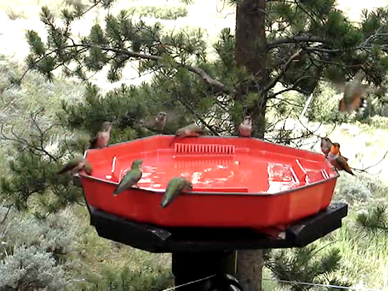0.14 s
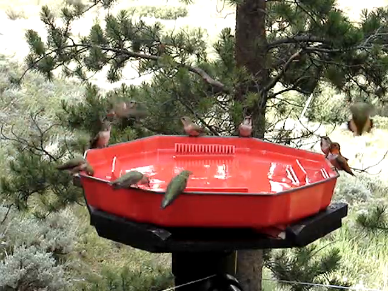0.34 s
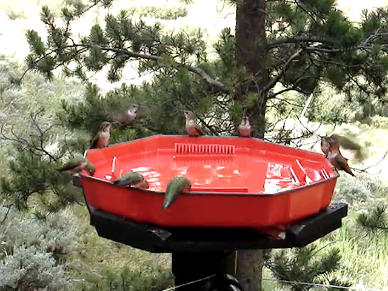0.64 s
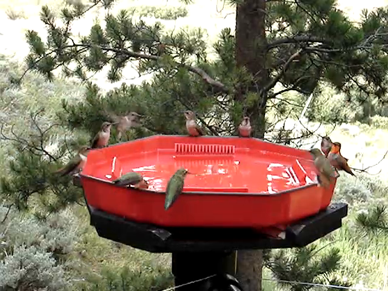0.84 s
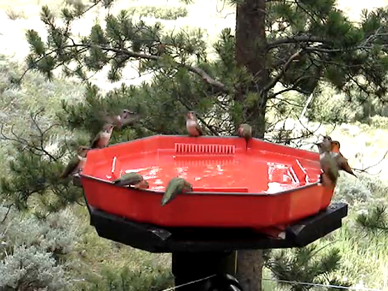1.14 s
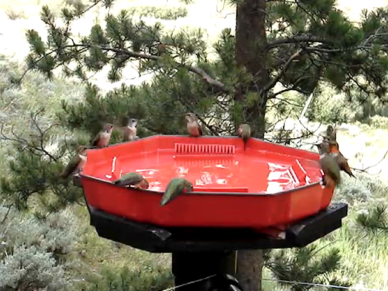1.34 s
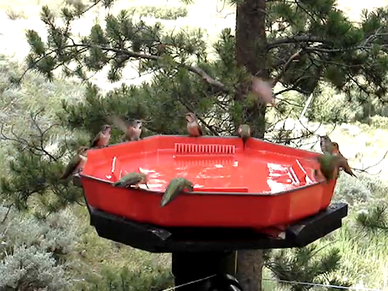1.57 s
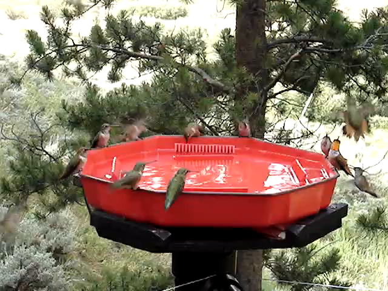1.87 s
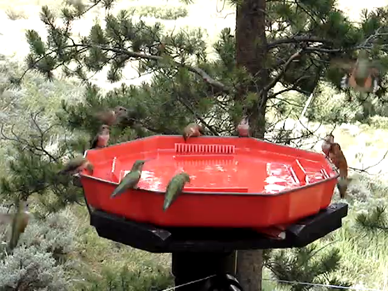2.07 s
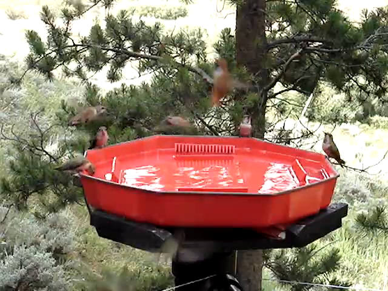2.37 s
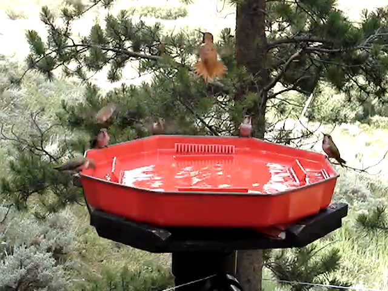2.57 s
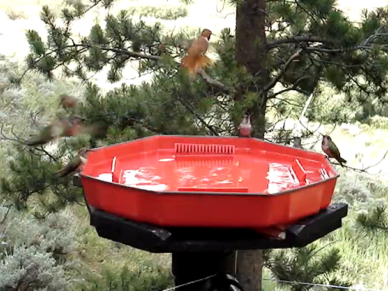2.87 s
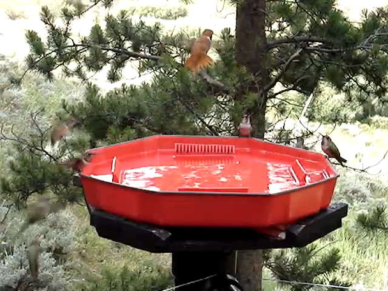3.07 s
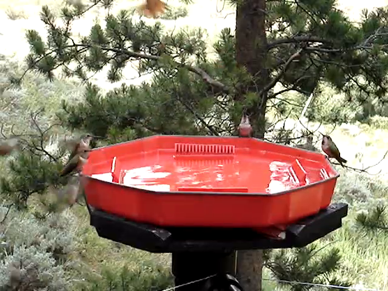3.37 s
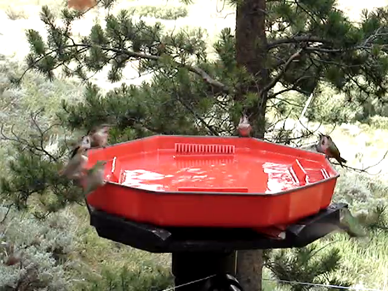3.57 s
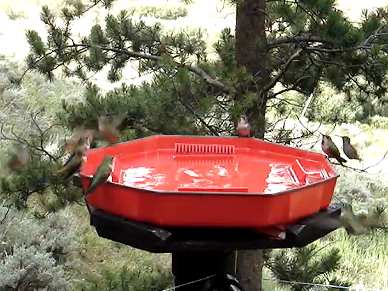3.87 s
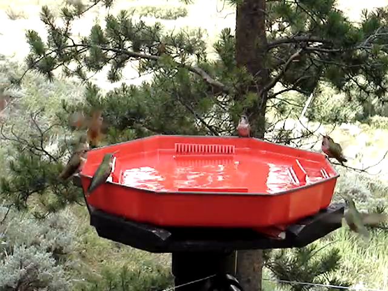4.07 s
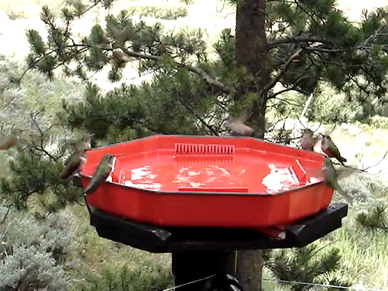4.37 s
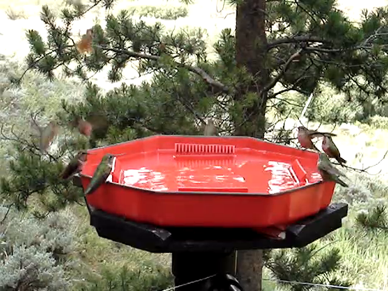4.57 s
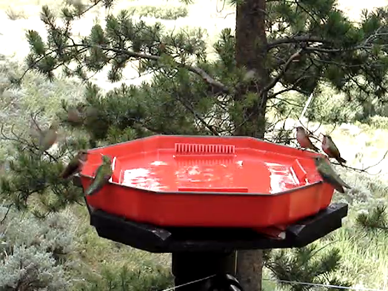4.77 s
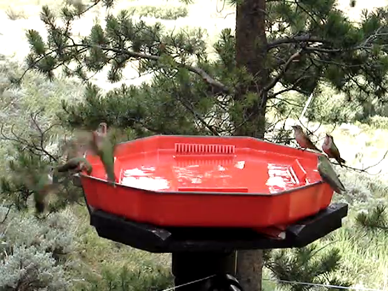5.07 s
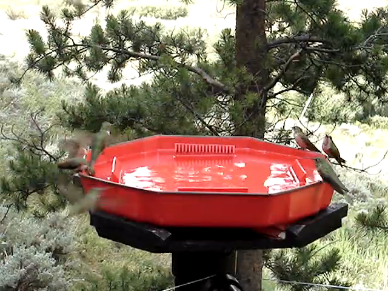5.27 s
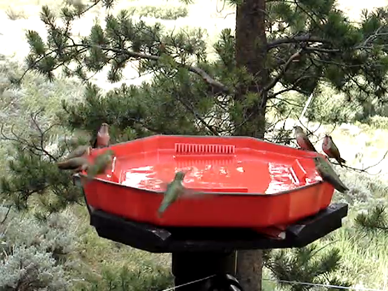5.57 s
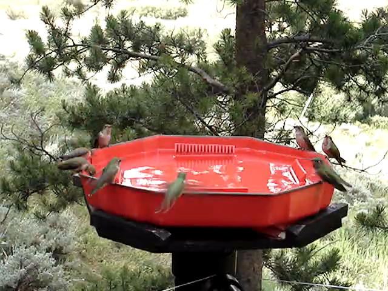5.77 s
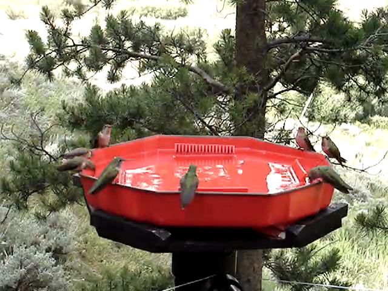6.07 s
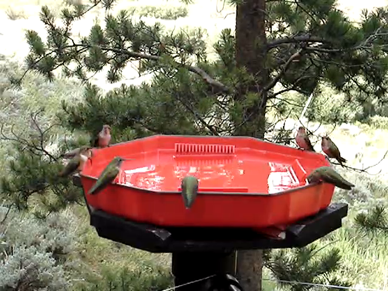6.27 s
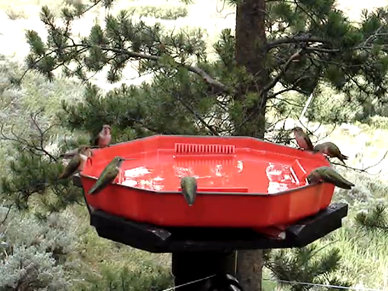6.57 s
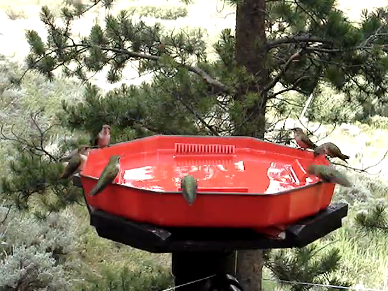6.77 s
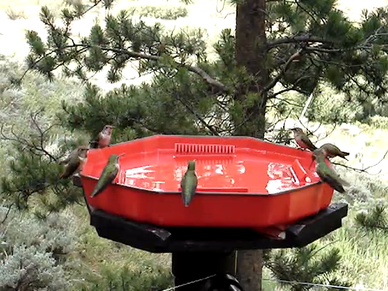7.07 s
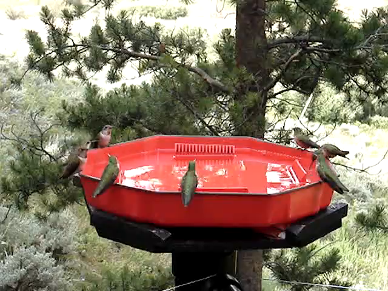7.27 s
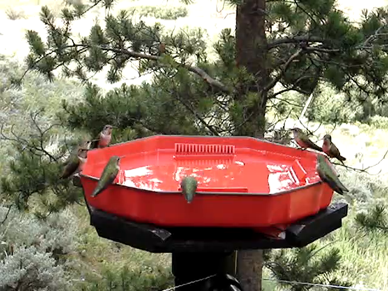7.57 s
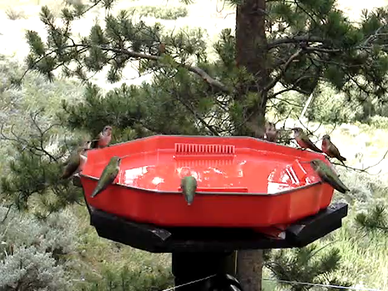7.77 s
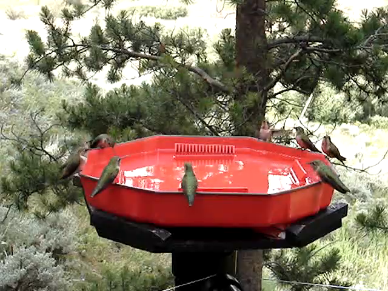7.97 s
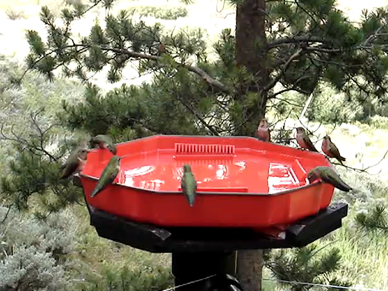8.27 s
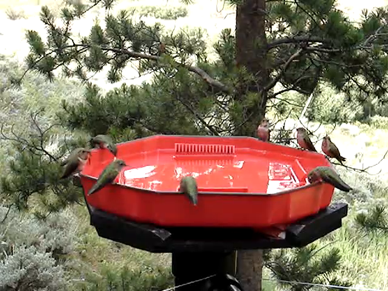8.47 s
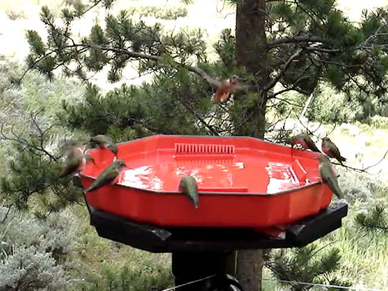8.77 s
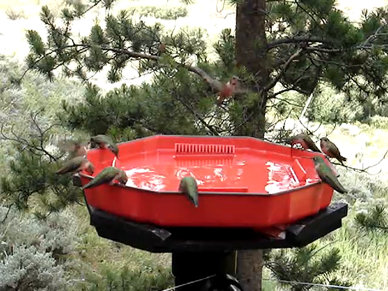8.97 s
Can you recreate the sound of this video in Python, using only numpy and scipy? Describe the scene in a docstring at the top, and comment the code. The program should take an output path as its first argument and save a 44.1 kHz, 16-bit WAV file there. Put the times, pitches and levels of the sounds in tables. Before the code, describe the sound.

A quarrelling flock of tiny birds chips and chitters rapidly up close, wings humming and whining past the microphone in soft open air.

```python
"""Hummingbirds squabble at a feeder under a pine: plunging chips, stuttered rattles, squeaks and buzzy trills.
Each voice is a shaky whistle with overtones, coloured by throat and beak and echoed by tray and twigs.
Wings hum low on multiples of their beat; the males' slotted wing tips whistle thinly on every stroke.
Fainter chips come from the branches, and the trees answer over a soft rush of open air."""
import sys
import numpy as np
from scipy import signal
from scipy.fft import rfft, irfft, next_fast_len
from scipy.io import wavfile
from scipy.ndimage import map_coordinates

SR = 44100
rng = np.random.default_rng(int(sys.argv[2]) if len(sys.argv) > 2 else 0)


def wav_record(signal):
    """Record a signal, one row per channel, as 16-bit PCM in the file named by sys.argv[1]."""
    frames = np.transpose(np.atleast_2d(signal))
    bounded = np.clip(frames, -1, 1)
    # unit amplitude maps onto the largest positive 16-bit level
    quanta = np.round(bounded * 32767).astype(np.int16)
    wavfile.write(sys.argv[1], SR, quanta)


N = 403074

# wing level of the whole flock around the microphone: (time [s], level [dB])
FLOCK_LEVEL = [(0, -50.5), (.7, -53.5), (1.15, -56.5), (1.6, -48), (2.9, -47), (4.4, -47.5), (5, -53),
               (5.9, -50), (6.3, -61), (7, -53), (7.8, -49), (9.14, -54)]
# birds darting past the microphone: (time [s], change of the wing level [dB], air puff [dB])
CLOSE_PASSES = [(.39, 4.5, -64), (.87, 4, -69), (1.17, -7, -54.5), (1.68, 3.5, -61), (1.92, -1, -51.5),
                (2.59, 2.5, -52), (2.87, 4, -56), (3.16, 3.5, -51), (3.759, -1, -50), (3.96, 1.5, -49),
                (4.75, 4, -63), (5, 1, -56), (5.72, -3.5, -57), (6.02, -2.5, -55), (6.73, 7, -72),
                (8.63, 1.5, -76)]
TAIL_SHARE = 0.25  # a chip's faint tail, as a share of its length


def amp(db):
    """Decibels to gain."""
    return 10 ** (np.asarray(db) / 20)


def unit(x):
    """Scale to rms 1."""
    return x / np.sqrt(np.mean(x ** 2) + 1e-20)


def along(points, hz):
    """Read (frequency [Hz], value) points on a log frequency axis."""
    f, v = np.transpose(points)
    return np.interp(np.log(hz + 1), np.log(f + 1), v)


def curve(rows):
    """Read (time [s], value) rows at every sample."""
    return np.interp(np.arange(N) / SR, *np.transpose(rows))


def wobble(rate, size=N):
    """A smooth random curve through normal-distributed knots, rate knots a second."""
    at = np.arange(size) * rate / SR
    knots = rng.standard_normal(int(at[-1]) + 3)
    fine = np.linspace(0, len(knots) - 1, 10 * len(knots))
    return np.interp(at, fine, map_coordinates(knots, [fine]))


def filtered(x, gain):
    """x times a gain that depends on frequency."""
    padded = next_fast_len(N + SR // 2)
    spectrum = rfft(x, padded) * gain(np.fft.rfftfreq(padded, 1 / SR))
    return irfft(spectrum, padded)[:N]


def coloured(x, spectrum):
    """x shaped by a (frequency [Hz], level [dB]) spectrum, at rms 1."""
    return unit(filtered(x, lambda hz: amp(along(spectrum, hz))))


def phase(hz):
    """Running phase of a moving frequency."""
    return 2 * np.pi * np.cumsum(hz) / SR


def clock(length):
    """Seconds and share elapsed within a note."""
    t = np.arange(max(int(length * SR), 8)) / SR
    return t, t / (t[-1] + 1 / SR)


def nearness(s):
    """How near a bird is, 0-1, that darts past the microphone at time s."""
    pass_s = 0.045  # spread of the bell-shaped approach
    return np.exp(-0.5 * ((np.arange(N) / SR - s) / pass_s) ** 2)


def scattered(note, echo_db, tray_db=-6, spread_s=0.0091, count=32):
    """The tray returns one clear copy, trunk and twigs a spray of weak ones, drawn anew for every note."""
    delay, strength = rng.exponential(spread_s, count), rng.standard_normal(count)
    delay = np.minimum(delay + 0.0005, 0.06)
    weight = strength * np.exp(-delay / (2 * spread_s))
    taps = np.bincount((delay * SR).astype(int), weight, minlength=SR // 100)
    taps /= np.linalg.norm(taps)
    taps[int(rng.uniform(0.003, 0.009) * SR)] += amp(tray_db)
    taps *= amp(echo_db)
    taps[0] += 1  # the direct sound
    return signal.fftconvolve(note, taps)


def add(out, s, note, echo_db=-6):
    """Mix in a note and its early echoes at time s."""
    note = scattered(note, echo_db)
    i = int(np.clip(round(s * SR), 0, N))
    out[i:i + len(note)] += note[:N - i]


def air(rush_db=-50.0):
    """A soft steady rush, and light puffs on the microphone from the flock and from passing birds."""
    # open air at the feeder: (frequency [Hz], level [dB])
    air_colour = [(30, -25), (60, -10), (105, -1), (190, 2), (400, 1.5), (750, -2), (1400, -6.5),
                  (3000, -10.5), (5200, -15.5), (7500, -19.5), (10000, -21.5)]
    # low puffs on the microphone: (frequency [Hz], level [dB])
    puff_colour = [(10, -1), (25, 2), (55, 1.5), (100, 5), (250, -46), (600, -85)]
    draught_db, swing_db = -16.5, 0.5  # the flock's draught relative to its wing level, and its unsteadiness
    rush = amp(rush_db) * coloured(rng.standard_normal(N), air_colour)
    draught = amp(curve(FLOCK_LEVEL) + draught_db + swing_db * wobble(23))
    gusts = sum(amp(puff_db) * nearness(s) for s, _, puff_db in CLOSE_PASSES)
    return rush + np.hypot(draught, gusts) * coloured(rng.standard_normal(N), puff_colour)


def trees(x):
    """Scattered echoes from trunk, needles and ground: decaying noise whose treble dies soonest."""
    # time for the echoes to fall by 60 dB: (frequency [Hz], decay time [s])
    decay_times = [(1000, 0.89), (5000, 0.09), (10000, 0.041)]
    hz, t, z = signal.stft(rng.standard_normal(SR // 2), SR, nperseg=256)
    decay = amp(-60 * t / along(decay_times, hz)[:, None])
    tail = signal.istft(z * decay, SR, nperseg=256)[1]
    tail = np.pad(tail, (int(0.0033 * SR), 0))  # the way out to the trees and back
    return signal.fftconvolve(x, tail / np.linalg.norm(tail))[:N]


def wings(hum_db=-3, wash_db=-3.5, count=11):
    """Hovering birds hum on multiples of their wingbeat and leave a turbulent wash."""
    # hovering birds; odd harmonics are weak when up- and downstroke are alike:
    # (wingbeat [Hz], share [dB], offset of the odd harmonics [dB])
    wingbeats = [(42.9, -4.5, -5), (53.35, -5.5, -1), (57.54, -6, 2)]
    # wing hum at the microphone: (frequency [Hz], level [dB])
    hum_colour = [(40, -35), (85, -5), (170, 0), (260, -1.5), (400, 0), (520, -3), (660, -21), (1200, -6),
                  (2500, -51)]
    # air stirred by wings: (frequency [Hz], level [dB])
    wash_colour = [(30, -24.5), (70, -15.5), (120, -2.5), (200, 2), (450, -9), (640, -8.5), (1200, -12),
                   (3000, -13), (9000, -50)]
    hum = np.zeros(N)
    for beat_hz, db, odd_db in wingbeats:
        stroke = phase(beat_hz * (1 + 0.02 * wobble(3)))
        # each harmonic swells and fades as the bird turns
        for k in range(1, count + 1):
            strength = amp(db + odd_db * (k % 2) + 4.3 * wobble(6))
            hum += strength * np.sin(k * stroke + 2 * np.pi * rng.random())
    wash = coloured(rng.standard_normal(N), wash_colour) * amp(3.1 * wobble(25))
    level_db = curve(FLOCK_LEVEL) + sum(rise_db * nearness(s) for s, rise_db, _ in CLOSE_PASSES)
    return amp(level_db) * (amp(hum_db) * coloured(hum, hum_colour) + amp(wash_db) * wash)


def wing_tip(beat_hz, whistle_hz, t, return_db=-10):
    """A slotted tip whistles on the downstroke, softly on the return, bending with the stroke."""
    bend_share = 0.018  # how far each stroke bends the whistle
    stutter_hz, stutter_depth = 230, 0.55  # mean rate and depth of a quick stutter within each stroke
    size = len(t)
    stroke = 2 * np.pi * beat_hz * t + 0.25 * wobble(14, size=size)
    bend = 1 + bend_share * np.sin(stroke)
    pitch = whistle_hz * bend + 50 * wobble(12.0, size=size) + 170 * wobble(760, size=size)
    speed = np.cos(stroke)
    burst = speed ** 2 * np.where(speed > 0, 1, amp(return_db)) * amp(2.5 * wobble(40, size=size))
    stutter = 1 + stutter_depth * np.cos(phase(stutter_hz * (1 + 0.3 * wobble(90, size=size))))
    return unit(burst * stutter * np.sin(phase(pitch)))


def whistles():
    """A male's wings whistle from take-off to landing: crisp pulses nearby, blurred by echoes farther off."""
    # short flights of the males:
    # (time [s], length [s], wing whistle [Hz], wingbeat [Hz], level [dB], early echoes [dB])
    flights = [(2.159, 0.13, 9440, 62, -54.5, -24), (2.747, 0.15, 6200, 45.2, -51.5, -4),
               (3.268, 0.24, 6370, 43, -50, -14), (3.401, 0.45, 9960, 61, -65.5, -18),
               (3.519, 0.32, 6370, 45.4, -45.5, -21), (4.249, 0.16, 6390, 43.8, -40, -21),
               (4.716, 0.16, 6250, 46.4, -48, -7), (5.061, 0.19, 6200, 45.5, -62.5, -3.5),
               (5.431, 0.28, 6230, 45.4, -53.5, 1), (5.836, 0.18, 9380, 59.7, -58.5, -14),
               (6.065, 0.13, 6470, 45.5, -54, 0), (6.07, 0.97, 9900, 60.1, -67.5, -12),
               (6.201, 0.54, 6260, 46.2, -61, 3.5), (6.763, 0.081, 6300, 47, -51.5, -11),
               (6.9, 0.27, 6370, 47.2, -47.5, -17), (7.281, 0.14, 6100, 45.6, -49, -11),
               (8.019, 0.11, 6400, 46, -48.5, -11), (8.459, 0.21, 6190, 46.1, -52, -3),
               (8.69, 0.25, 6200, 46, -64, 2)]
    take_off_s, landing_s = 0.02, 0.017  # the whistle swells before a flight and dies after it
    out = np.zeros(N)
    for s, length, whistle_hz, beat_hz, db, echo_db in flights:
        t, _ = clock(take_off_s + length + landing_s)
        effort = np.clip(np.minimum(t / take_off_s, (t[-1] - t) / landing_s), 0, 1)
        whistle = wing_tip(beat_hz, whistle_hz, t - take_off_s)
        add(out, s - take_off_s, amp(db) * effort * whistle, echo_db)
    return out


def syrinx(pitch, overtone_db, jitter=0.016, flutter_db=3):
    """A shaky whistle whose harmonics flutter and are coloured by throat and beak."""
    # throat and beak: (frequency [Hz], level [dB])
    beak = [(1500, -0.5), (2500, -2), (4000, -1), (6000, 2.5), (8500, -1), (10000, -10.5)]
    size = len(pitch)
    pitch = pitch * (1 + jitter * wobble(901, size=size))
    k = np.arange(1, 6)[:, None]  # harmonic numbers
    flutter = flutter_db * np.array([wobble(253.5, size=size) for _ in k]) * np.sqrt(k / 2)
    audible = np.clip(2 - 5 * k * pitch / SR, 0, 1)  # fades harmonics out well below half of SR
    colour_db = along(beak, np.abs(k * pitch)) + overtone_db * np.log2(k)
    gain = amp(colour_db + flutter - flutter_db / 2) * audible
    return np.sum(gain * np.sin(k * phase(pitch)), axis=0)


def chip(length, start_hz, end_hz, fall, overtone_db, attack=0.003, decay_db=4, tail_db=-13):
    """The pitch plunges, levels out unsteadily, and sags into a faint tail as the pressure gives out."""
    sag_share = 0.2  # how far the pitch keeps falling over the chip's length
    rasp = 0.028  # pitch jitter, as a share of the pitch
    dulling = 150  # steepening of the overtone slope as air runs out [dB per octave per s]
    t, _ = clock((1 + TAIL_SHARE) * length)
    u = t / length
    plunge = end_hz + (start_hz - end_hz) * np.exp(-(t / fall) ** 1.2)
    pitch = plunge * (1 + sag_share * (1 / 5 - u ** 2))
    pitch *= 1 + 0.012 * wobble(180, size=len(t))
    body = np.sqrt(np.maximum(1 - u, 0))
    tail = amp(tail_db) * np.sqrt(np.clip((1 + TAIL_SHARE - u) / TAIL_SHARE, 0, 1))
    pressure = np.minimum(t / attack, 1) * np.maximum(body, tail) * amp(decay_db * (1 / 3 - u))
    return syrinx(pitch, overtone_db - dulling * (t - fall), rasp) * pressure


def far_chips(count=110):
    """Other birds chip faintly at random from the branches, louder as the quarrel flares."""
    # chatter in the branches: (time [s], level [dB])
    squabble = [(0, -49), (.7, -56.5), (2.5, -48.5), (3.8, -47), (4.5, -45), (5.05, -58), (5.8, -44.5),
                (6.2, -58), (7.1, -53), (7.8, -44), (8.6, -48.5), (9.14, -55.5)]
    out = np.zeros(N)
    for when, high, long in rng.random((count, 3)):
        note = chip(0.012 + 0.014 * long, 7000, 2400 + 1800 * high, 0.004 + 0.003 * long, -6)
        add(out, when * N / SR, note, echo_db=6)  # echoes outweigh the direct sound
    return amp(curve(squabble)) * out


def clear_tones():
    """Squeaks, short gliding pieces that open or bridge a chip, and one brief wing whistle; most arch."""
    # short clear tones: squeaks, pieces of chips, and one brief wing whistle (at 8.001 s):
    # (time [s], length [s], start [Hz], end [Hz], arch [Hz], final drop [Hz], level [dB],
    # overtone slope [dB per octave])
    tones = [(0.107, 0.013, 5070, 4760, 100, 0, -38.5, 1), (1.553, .0086, 9400, 7670, 300, 0, -27, 3),
             (1.59, 0.0157, 2100, 2510, 0, 0, -30, -20), (1.674, 0.0072, 9700, 8250, 250, 0, -30, 0),
             (2.896, 0.036, 4260, 4300, 600, 2498, -26, -1.5), (3.785, .021, 4900, 5160, 400, 0, -39, 0),
             (3.933, .018, 9900, 7800, 100, 0, -30, 0), (4.102, .008, 9200, 7900, 200, 0, -30, 0),
             (7.46, 0.0044, 8400, 7500, 200, 0, -32, 0), (8.001, 0.025, 5900, 6090, 353, 0, -32.5, 0),
             (9.04, 0.0062, 9300, 7960, 200, -5, -36, 0)]
    out = np.zeros(N)
    for s, length, start_hz, end_hz, arch_hz, drop_hz, db, overtone_db in tones:
        _, u = clock(length)
        arch = np.sin(np.pi * u)
        pitch = start_hz + (end_hz - start_hz) * u + arch_hz * arch - drop_hz * u ** 5
        add(out, s, amp(db) * np.sqrt(arch) * syrinx(pitch, overtone_db), echo_db=-13)
    return out


def trills(upswing=0.3, uneven_db=1.8):
    """A high whistle glides while its pitch swings rapidly, in uneven pulses that favour the upswing."""
    # trills near the microphone: (time [s], length [s], start [Hz], end [Hz], arch [Hz], swing [Hz],
    # trill rate [Hz], level [dB], throb [+1 loudest at the foot of the swing, -1 at its top],
    # rasp [share of the pitch], attack [s], release [s], early echoes [dB])
    trill_notes = [(.354, 0.038, 6000, 7730, 196, 720, 310, -37, -.4, 0.022, 0.0065, .012, -4),
                   (1.2367, 0.089, 7460, 7580, 350, 1850, 113.4, -30.5, 0.53, 0.02, 0.033, .008, -19),
                   (1.329, 0.021, 6300, 6370, 2, 1400, 109, -33.5, .6, .018, 0.0028, .003, -12),
                   (1.347, 0.16, 7500, 7050, 301, 1640, 105, -31, 0.029, .016, .008, 0.096, -10),
                   (1.886, 0.044, 7700, 8800, 400, 700, 199, -31, .31, 0.034, 0.022, .008, -1.5),
                   (1.9091, 0.097, 6720, 6510, -250, 1040, 114.5, -25, 0.73, 0.03, .003, 0.022, -22),
                   (2.667, 0.056, 4950, 6740, 350, 995, 320, -26, 0.14, 0.021, 0.0086, .006, -15),
                   (3.068, 0.066, 4740, 6180, 849, 1000, 347, -26, -0.023, .022, 0.007, .012, -19),
                   (3.886, 0.031, 4460, 5430, 3, 1210, 240, -35, .07, .059, .003, 0.011, -9),
                   (3.914, 0.042, 6970, 3990, -300, 300, 322, -33.5, .5, .04, .004, .015, -7),
                   (3.935, .17, 8500, 8270, -1, 1180, 203, -35.5, -.28, .04, 0.016, 0.046, -1.5),
                   (4.3812, 0.14, 7220, 7300, 452, 1020, 100.3, -29, -0.57, .02, .012, .03, -8),
                   (5.779, .039, 6780, 4160, -100, 455, 316, -33.5, 0.72, 0.042, 0.0035, 0.0063, -7),
                   (5.86, 0.057, 5180, 5640, 2, 1800, 272.5, -40, -0.14, 0.11, .005, .015, -11),
                   (7.708, 0.17, 7270, 7900, 244, 1200, 128, -33.5, -0.35, .031, 0.018, 0.076, 0),
                   (7.77, 0.039, 6700, 4200, 2, 454, 297, -28.5, -0.071, .04, 0.0081, 0.015, -11),
                   (8.151, .098, 6620, 8100, 599, 695, 208, -33.5, -.46, .024, 0.031, .025, 0.5)]
    out = np.zeros(N)
    for (s, length, start_hz, end_hz, arch_hz, swing_hz, rate_hz, db,
         throb, rasp, attack, release, echo_db) in trill_notes:
        t, u = clock(length)
        turn = phase(rate_hz * (1 + 0.015 * wobble(120, size=len(t))))
        glide = start_hz + (end_hz - start_hz) * u + arch_hz * np.sin(np.pi * u)
        voice = syrinx(glide + swing_hz * np.cos(turn), -8, rasp, flutter_db=2)
        ramp = np.minimum(np.minimum(t / attack, (1 - u) * length / release), 1)
        swell = np.sin(np.pi / 2 * ramp)
        uneven = amp(uneven_db * wobble(170, size=len(t)))
        pulse = unit(np.exp(-throb * np.cos(turn) - upswing * np.sin(turn)) * uneven)
        add(out, s, amp(db) * swell * pulse * voice, echo_db)
    return out


def rattles(fade_db=6, uneven_db=1.0):
    """Stuttered chips, about 60 to 125 a second, uneven and weakening towards the end."""
    # runs of very short chips: (time [s], notes [count, rounded], spacing [s], start [Hz], end [Hz],
    # level [dB], overtone slope [dB per octave])
    rattle_runs = [(1.802, 5, 0.0093, 3970, 1930, -27.5, -5.5), (2.1794, 2.5, 0.017, 8400, 3090, -30, -6),
                   (2.266, 3.8, 0.0093, 7580, 2300, -26, -2), (2.581, 4.7, 0.008, 7490, 2060, -25.5, -1),
                   (2.986, 4.2, 0.0089, 7490, 2110, -24, -1), (3.79, 1.8, 0.013, 7240, 2730, -30.5, -8),
                   (5.672, 2, .011, 6020, 2590, -34.5, -10), (7.643, 5.3, 0.0122, 6040, 2813, -30, -0.5),
                   (8.073, 2.97, 0.0097, 7000, 2900, -34, -2)]
    out = np.zeros(N)
    for s, notes, spacing, start_hz, end_hz, db, overtone_db in rattle_runs:
        for k in range(round(notes)):
            note = chip(0.0087, start_hz, end_hz, 0.0024, overtone_db, attack=0.0012, decay_db=4.5)
            note_db = db + rng.normal(0, uneven_db) - fade_db * (k / notes) ** 2
            add(out, s + k * spacing, amp(note_db) * note, echo_db=-13.5)
    return out


def chips(level_db=-0.43):
    """Single scolding chips from the birds around the rim, each with its own plunge and harshness."""
    # the nearest chips: (time [s], length [s], start [Hz], end [Hz], plunge time [s],
    # level ahead of level_db [dB], overtone slope when the plunge time is up [dB per octave])
    chip_notes = [(0.0075, 0.015, 6300, 3600, 0.0037, -30.5, -8.5),
                  (0.052, 0.035, 7560, 4100, 0.0074, -44.5, -3),
                  (0.121, 0.009, 4900, 2280, 0.0036, -35.5, -4), (0.275, 0.01, 4120, 2230, 0.0027, -37, -9),
                  (0.301, 0.019, 6330, 3120, 0.0055, -41, -9),
                  (0.382, 0.014, 7000, 4600, 0.0042, -34.5, -8),
                  (0.406, 0.051, 5370, 2120, 0.012, -35.5, -5),
                  (0.548, 0.031, 6000, 2810, 0.0064, -37.5, -5),
                  (0.688, 0.03, 5500, 3490, 0.0038, -42.5, -11),
                  (0.8166, 0.028, 9100, 4320, 0.0041, -43, -4),
                  (0.933, 0.027, 5790, 2960, 0.0063, -38.5, -2),
                  (1.041, 0.021, 5200, 2460, 0.0048, -30.5, -10),
                  (1.062, 0.032, 7000, 4180, 0.006, -39, -6), (1.109, 0.04, 5750, 3410, 0.0072, -39, -9),
                  (1.15, 0.018, 4780, 2600, 0.0052, -40, -13),
                  (1.196, 0.022, 9160.0, 3050, 0.0042, -38, -2.5),
                  (1.291, 0.017, 5640, 2230, 0.0026, -38, -8.0),
                  (1.559, 0.033, 9430.0, 2204, 0.0066, -29.5, -1),
                  (1.595, 0.023, 2900, 1740, 0.009, -29.5, -3),
                  (1.676, 0.066, 9630.0, 1823, 0.0073, -30.5, -3),
                  (1.931, 0.053, 8930, 1796, 0.0039, -28, -10),
                  (2.0735, 0.024, 5500.0, 1650, 0.0092, -30, -2),
                  (2.1046, 0.025, 5530, 3030, 0.0055, -33, -4),
                  (2.349, 0.055, 7420.0, 1875, 0.0074, -27.5, -1),
                  (2.4754, 0.044, 4620, 1700, 0.0085, -32, 0),
                  (2.621, 0.028, 6400, 3320, 0.0063, -33.5, -7),
                  (2.715, 0.021, 4400.0, 1890, 0.0089, -27.5, -1),
                  (2.8066, 0.034, 4600, 1770, 0.007, -31.5, -1.5),
                  (2.866, 0.017, 4480.0, 2220, 0.0094, -33.5, -14.0),
                  (3.084, 0.021, 5900, 3620, 0.0062, -32, -12),
                  (3.1274, 0.012, 6550, 1760, 0.0055, -26.5, -5),
                  (3.1655, 0.011, 5920, 3180, 0.0044, -27.5, -4),
                  (3.205, 0.029, 3800.0, 1730, 0.0094, -30, -1.5),
                  (3.345, 0.03, 5040, 3220, 0.0081, -31, -9), (3.381, 0.036, 8570, 3280, 0.0058, -30.5, -4),
                  (3.387, 0.015, 5980, 2080, 0.0065, -35, -6), (3.446, 0.034, 7240, 3670, 0.0064, -37, -1),
                  (3.475, 0.026, 6840.0, 2970, 0.0043, -35, -1.5),
                  (3.5586, 0.02, 7100, 3760, 0.003, -31.5, -4),
                  (3.574, 0.027, 5370, 3280, 0.0079, -29.5, -10),
                  (3.626, 0.015, 6300, 2760, 0.0055, -33, -5), (3.739, 0.019, 7330, 2620, 0.0047, -32, -7),
                  (3.78, 0.007, 6000.0, 2170, 0.002, -33, -8),
                  (3.8146, 0.032, 5830, 3080.0, 0.0095, -31, -2),
                  (3.849, 0.038, 9350.0, 4020, 0.0061, -38, -16),
                  (3.964, 0.023, 5900, 2890.0, 0.0098, -39, -8.0),
                  (4.01, 0.037, 9570.0, 2790, 0.0054, -33.5, 1),
                  (4.106, 0.023, 9470, 3100, 0.0052, -31, 4.5), (4.15, 0.026, 5700, 3480, 0.0061, -30, -8),
                  (4.1915, 0.02, 8800, 3140, 0.004, -34, 2.5),
                  (4.235, 0.025, 4740, 2720, 0.0056, -34.5, -6),
                  (4.247, 0.025, 6640.0, 3410, 0.0057, -33.5, -12),
                  (4.299, 0.018, 7200, 2430, 0.0048, -31.5, -9),
                  (4.335, 0.019, 5200, 2420, 0.0049, -34.5, -7),
                  (4.347, 0.024, 5300, 2700, 0.0056, -35.5, -11),
                  (4.423, 0.013, 5650, 3770, 0.0072, -37.5, -8.0),
                  (4.432, 0.017, 7100, 2520, 0.0046, -32, -4), (4.51, 0.027, 5770, 3370, 0.0057, -37.5, 4),
                  (4.558, 0.02, 5720, 2360, 0.0044, -39.5, -0.5),
                  (4.6004, 0.015, 8470.0, 3400, 0.0072, -35.5, 10),
                  (4.611, 0.052, 5240, 2490, 0.011, -38.5, 1),
                  (4.7545, 0.019, 8850, 3290, 0.0044, -34, 0.5),
                  (4.838, 0.015, 8800, 3230, 0.0035, -31.5, -1.5),
                  (4.882, 0.021, 7000.0, 4100, 0.0043, -39, -17),
                  (4.9064, 0.039, 6000.0, 2790, 0.012, -31, -4),
                  (5.159, 0.017, 6500, 3860, 0.0081, -37.5, -6.0),
                  (5.2152, 0.018, 8810.0, 2420, 0.0044, -41.5, -3.5),
                  (5.312, 0.034, 6410.0, 3500, 0.0052, -37.5, -4.5),
                  (5.387, 0.02, 8580, 3170, 0.0043, -30, -3), (5.462, 0.018, 8730, 3030, 0.0046, -31.5, -2),
                  (5.542, 0.019, 8940, 2950, 0.0046, -30.5, -8.5),
                  (5.6554, 0.012, 5180, 2000, 0.0057, -33, -11),
                  (5.661, 0.021, 7000, 3670, 0.0062, -32.5, -7),
                  (5.6955, 0.0073, 6230, 2180.0, 0.0054, -31, -7),
                  (5.738, 0.028, 5360, 3160, 0.0076, -32.5, -9),
                  (5.884, 0.031, 6330, 2630, 0.0087, -32.5, -1.5),
                  (6.088, 0.011, 6030.0, 3200, 0.0085, -35, 6),
                  (6.0932, 0.033, 4980, 3220, 0.0085, -29.5, -7.5),
                  (6.436, 0.023, 6100, 3500, 0.006, -29.5, -4),
                  (6.4793, 0.022, 7980, 2670, 0.0041, -34.5, -4),
                  (6.7855, 0.021, 7230, 4140, 0.007, -34.5, -7), (6.822, 0.02, 6460, 3280, 0.0044, -43, 2),
                  (6.918, 0.026, 6400, 3870, 0.0088, -44, 2.5), (7, 0.021, 6540, 3650, 0.0063, -46, 4.5),
                  (7.1541, 0.012, 6810, 2100, 0.0032, -39, -15),
                  (7.242, 0.012, 7500, 3800, 0.005, -39.5, -1),
                  (7.2464, 0.026, 5610, 3320, 0.0082, -31.5, -14),
                  (7.299, 0.0087, 6800, 2790, 0.0027, -34, -3), (7.312, 0.028, 6615, 2920, 0.0046, -38, -4),
                  (7.3767, 0.03, 9320.0, 3210, 0.0036, -32.5, 0.5),
                  (7.4553, 0.024, 9160, 2910, 0.0039, -31, 3.5),
                  (7.5393, 0.024, 8610, 2940, 0.0039, -31.5, 1.5),
                  (7.547, 0.026, 7490, 2817, 0.005, -34.5, -6), (7.647, 0.018, 5200, 2600, 0.004, -34, -10),
                  (7.827, 0.022, 7200, 2000, 0.012, -33, -6), (7.883, 0.025, 5954, 2768, 0.0036, -37, -5),
                  (7.906, 0.053, 8900.0, 2450, 0.0074, -35, -1),
                  (8.017, 0.023, 6720, 2340, 0.0095, -37.5, -2),
                  (8.099, 0.029, 5230.0, 3030, 0.013, -34.5, -7),
                  (8.237, 0.038, 6490.0, 2560, 0.012, -33.5, 1.5),
                  (8.328, 0.048, 8760.0, 2490.0, 0.0067, -35.0, -1.5),
                  (8.409, 0.015, 6200, 3750, 0.0067, -37, -19),
                  (8.424, 0.021, 7330, 2710, 0.0071, -31.5, -6.5),
                  (8.4782, 0.021, 5940, 3350, 0.0034, -36, -5), (8.558, 0.023, 7000, 3730, 0.0038, -41, 2),
                  (8.5934, 0.024, 5350, 3610, 0.0063, -30, -10),
                  (8.629, 0.031, 6000, 3030.0, 0.0057, -37.5, -6),
                  (8.72, 0.014, 6820, 2190, 0.0036, -35, -9),
                  (8.856, 0.017, 4970, 3323, 0.0034, -30.5, -13),
                  (8.9, 0.037, 5910, 2750, 0.0071, -38.5, -4.5),
                  (9.0403, 0.024, 9020, 3420, 0.0047, -30, -2.5),
                  (9.1282, 0.016, 8710.0, 3820.0, 0.0026, -27.5, 0)]
    out = np.zeros(N)
    for s, length, start_hz, end_hz, fall, db, overtone_db in chip_notes:
        add(out, s, amp(db + level_db) * chip(length, start_hz, end_hz, fall, overtone_db))
    return out


def scene():
    """Near and distant birds, their echoes and the open air."""
    birds = chips() + rattles() + trills() + clear_tones() + whistles()
    far = far_chips()
    echoes = trees(amp(-19.0) * birds + amp(-6) * far)
    return (birds + far + echoes + wings() + air())[None]


def record(dry):
    """The microphone channel cuts off steeply above its band limit."""
    top_hz = 10000
    return np.array([filtered(x, lambda hz: 1 / np.sqrt(1 + (hz / top_hz) ** 160)) for x in dry])


dry = scene()
out = record(dry)
wav_record(out)
```